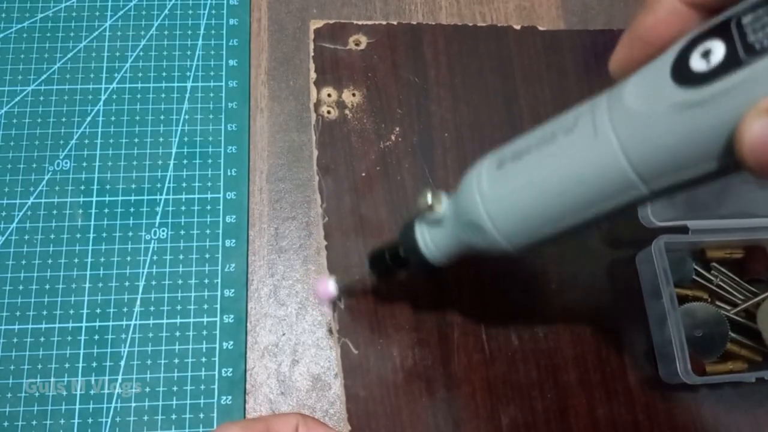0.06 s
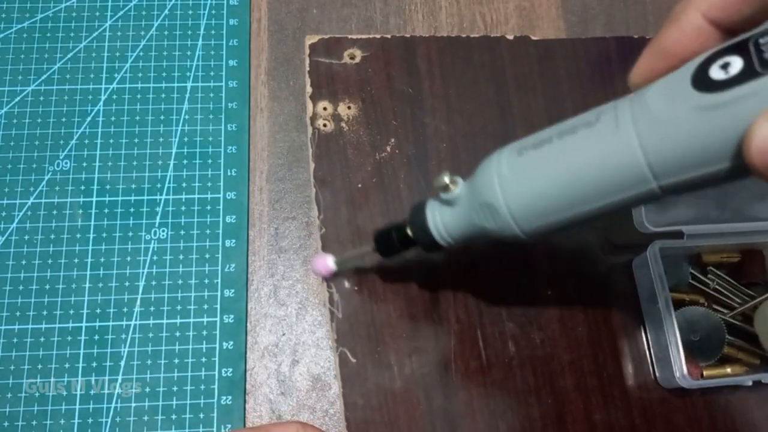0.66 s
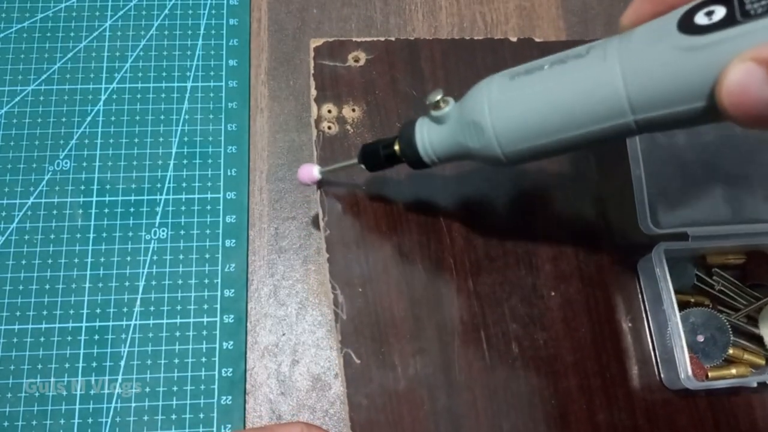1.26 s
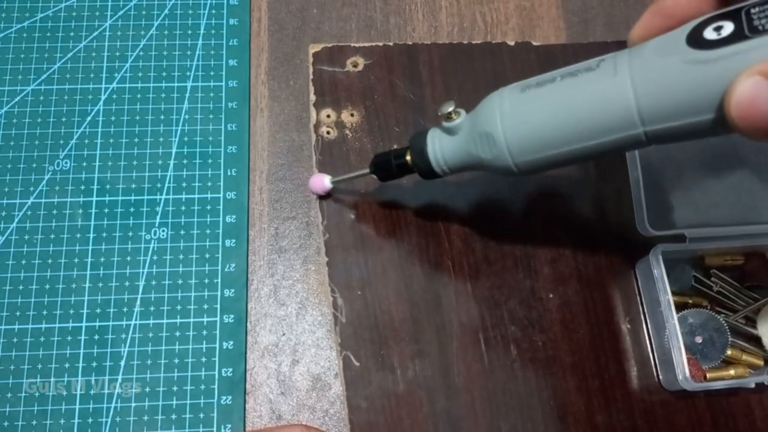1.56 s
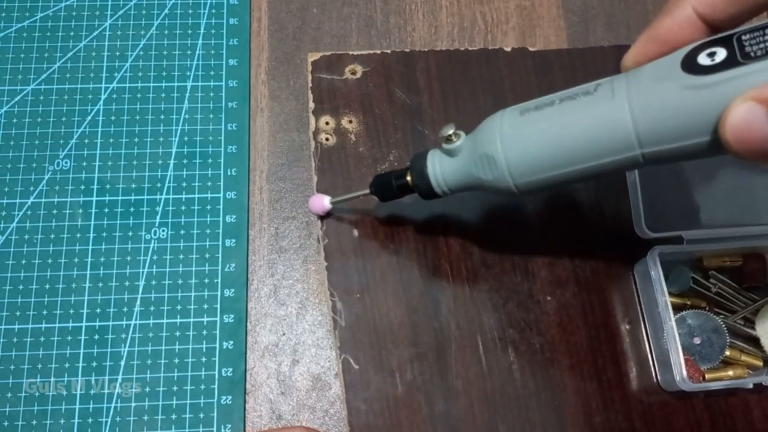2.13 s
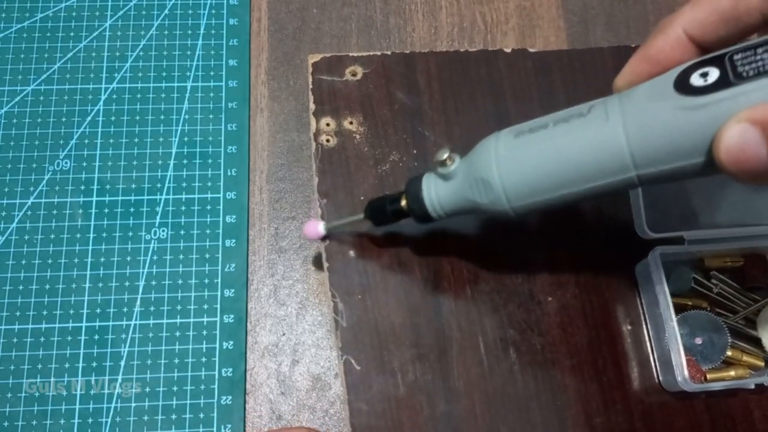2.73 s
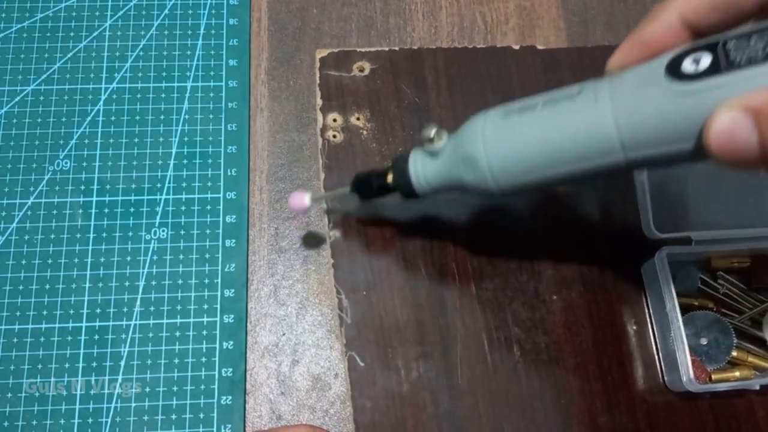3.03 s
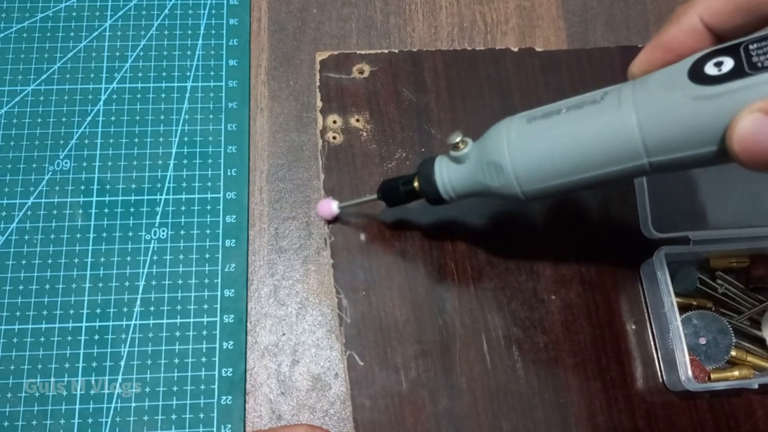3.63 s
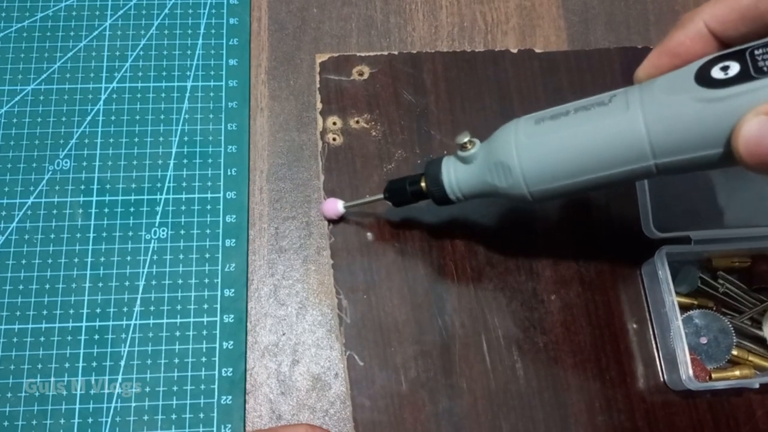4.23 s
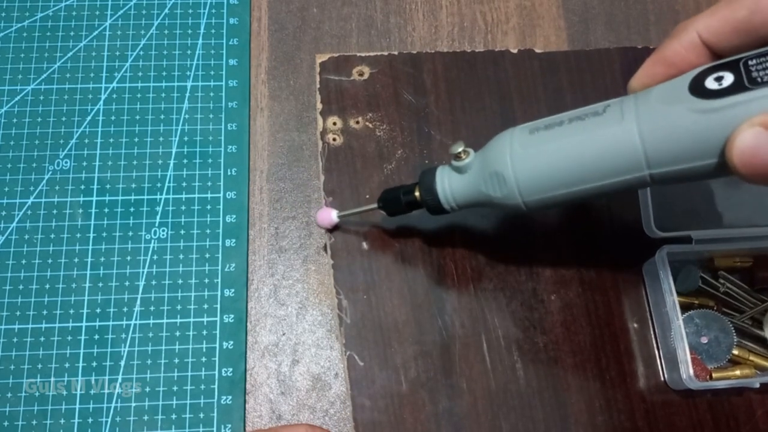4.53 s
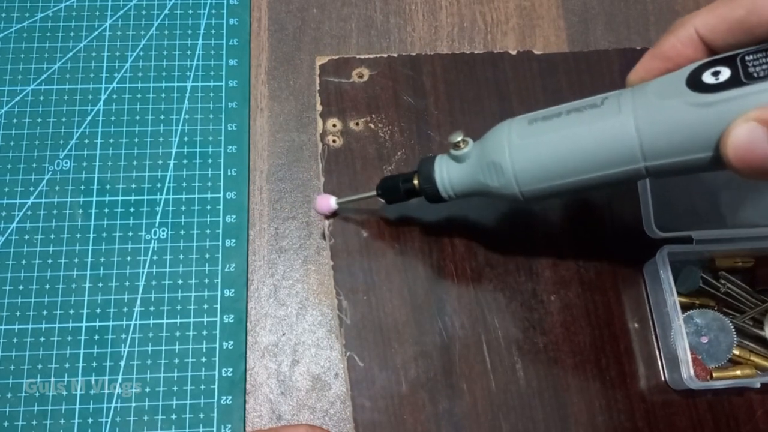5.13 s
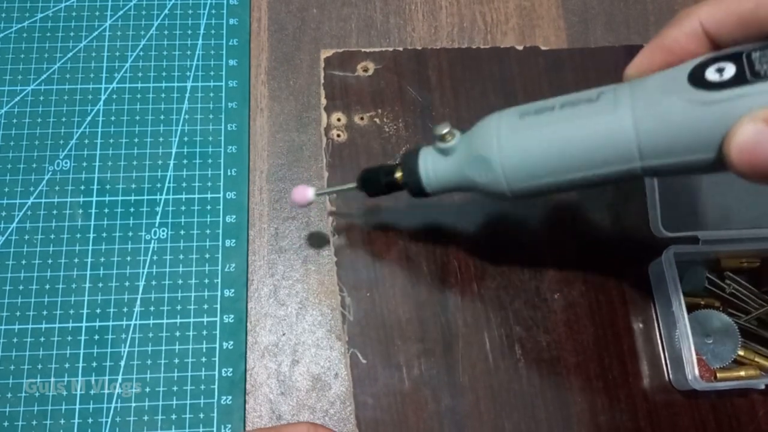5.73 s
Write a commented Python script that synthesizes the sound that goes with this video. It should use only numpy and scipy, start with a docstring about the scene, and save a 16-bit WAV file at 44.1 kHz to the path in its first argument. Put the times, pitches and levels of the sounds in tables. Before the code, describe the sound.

A small electric rotary tool is already grinding a wooden board edge, close up in a quiet room. Its rough buzz carries a dusty hiss, with a hollow ring and thin squeals around 0.5 seconds, then turns to a skipping chatter before lifting at 1.2. The motor whirs quietly with a thin whine. A second pass runs from 1.4 to 2.9 seconds, sinking in pitch, growing loudest near 2.1 and ending with a few ticks. After another short whir comes a lighter, ticking touch from 3.2 to 3.4. The longest pass runs from 3.6 to 5.6 seconds: the buzz slows and deepens, rings strongly with a faint squeal near 3.9, and turns more ragged and nasal around 4.3 and 5. The stone bounces and ticks near 5.5, then lifts, and the motor rises to a soft free whir.

```python
"""A small electric rotary tool grinds the edge of a wooden board with a stone, in four close-up passes.
The stone's high side rubs once a turn and makes the board ring. Pressed hard, it slows and buzzes;
held lightly, it skips and bounces. Dust hisses, the stone ticks and thin squeals come and go.
Lifted off, the motor speeds up and whirs, with brush hiss and the thin whine of its speed controller.
Behind it all is the faint air of a quiet room."""
import sys
import numpy as np
from scipy import signal
from scipy.fft import rfft, irfft
from scipy.io import wavfile
from scipy.ndimage import uniform_filter1d, map_coordinates

SR = 44100
rng = np.random.default_rng(int(sys.argv[2]) if len(sys.argv) > 2 else 0)


def to_wav(sig):
    """Store sig (one row per channel, or 1-D mono) as 16-bit WAV at the path in sys.argv[1].

    Samples outside -1..1 are clipped; the rate is SR.
    """
    pcm = np.clip(np.atleast_2d(sig), -1, 1) * 32767
    pcm = np.round(pcm).astype(np.int16)
    wavfile.write(sys.argv[1], SR, pcm.T)  # frames by channels


N = 254898
T = np.arange(N) / SR
FFT_SIZE = 9 * 2 ** 15
FREQ = np.maximum(np.arange(FFT_SIZE // 2 + 1) * SR / FFT_SIZE, 1)

# tone colour of the still room: pitch_hz, gain_db
AIR_COLOUR = [(20, -8), (60, 1), (130, 4), (250, -22), (1000, -39), (16000, -21)]
# right microphone compared with the left: pitch_hz, gain_db
STEREO_TILT = [(130, -0.2), (260, -5), (500, 1.5), (1000, -0.6), (2000, -1.5), (4000, -1.5), (8000, 3.5),
               (13000, 2)]
# left-right difference compared with what both sides share: pitch_hz, gain_db
STEREO_SPREAD = [(130, -20.5), (260, -14.5), (500, -11), (1000, -12.5), (2000, 0.5), (4000, 0.5),
                 (8000, -0.5), (13000, -1.5)]
# how much of that difference is scattered sound: pitch_hz, share_db
STEREO_SCATTER = [(130, -2), (500, -4), (1000, -13), (2000, -33), (4000, -10), (16000, -15)]
# tones of the motor: multiple_of_shaft_speed, relative_db
MOTOR_TONES = [(5, -8), (6, 6.5), (7, -29), (8, 9.5), (9, 12.5), (10, -8), (11, 5.5), (12, -41), (13, -18),
               (14, -3), (15, 7), (16, -14), (20, -6), (21, 4.5), (36, -3), (42, -22)]
# tone colour of the brushes sliding on the motor's contacts: pitch_hz, gain_db
BRUSH_COLOUR = [(100, -14), (600, -12), (1100, 6.5), (2300, 3), (3600, 1.5), (4700, 3), (6700, 2.5),
                (7300, -6), (10200, -5), (11500, 5), (13500, 2), (14400, 9), (16000, -4)]
# modes (pitches at which a thing likes to ring) of the motor's case: pitch_hz, width_hz, lift_db
HOUSING_MODES = [(5230, 250, 3), (11400, 460, 4), (12600, 540, 7)]
# the speed controller's whine: pitch_hz, free_running_db, rise_db_per_hz_of_slowing
WHINE_TONES = [(3903, -62.5, .17), (7806, -68, 0), (11709, -72, 0), (15612, -69, 0)]
# shaft speed on the wood, one list for each pass: time_s, speed_hz
SHAFT_SPEED = [
    [(0.0, 146.7), (0.164, 151.6), (0.184, 150.9), (0.252, 146.8), (0.4, 144.4), (0.558, 135),
     (0.616, 139.9), (0.682, 140.8), (0.738, 138.8), (0.782, 140.6), (0.824, 139.1), (0.916, 138.2),
     (1.114, 138.8), (1.142, 141.1), (1.205, 141)],
    [(1.4, 150.1), (1.436, 151.4), (1.49, 148.8), (1.558, 149), (1.762, 133.1), (1.83, 131), (1.976, 137.1),
     (2.064, 127.9), (2.352, 119.2), (2.624, 116.1), (2.67, 121), (2.756, 118.2), (2.82, 122.2),
     (2.866, 137.2), (2.9, 139.3)],
    [(3.2, 156.8), (3.218, 155.5), (3.288, 152.1), (3.322, 154.3), (3.39, 149.6), (3.42, 147.4)],
    [(3.57, 153.4), (3.69, 139.9), (3.862, 128.4), (4.134, 124.4), (4.218, 121.2), (4.378, 124.6),
     (4.45, 119.3), (4.634, 115.7), (4.76, 114.9), (5.066, 120.5), (5.182, 119.7), (5.282, 110.8),
     (5.31, 110.6), (5.492, 129.2), (5.56, 142.4)],
]
# each pass and the base level of each part of the board's sound:
# touch_s, lift_s, body_db, rasp_db, nasal_db, low_nasal_db, drone_db, thrum_db
PASSES = [(-.1, 1.204, -35.5, -34.5, -35, -74, -50, -40.5),
          (1.405, 2.945, -33, -34.5, -40.5, -50, -42, -32), (3.2, 3.439, -37, -37, -44, -47, -52.5, -32.5),
          (3.57, 5.586, -32.5, -34, -35.5, -48.5, -41, -34.5)]
# how hard the stone rubs and cuts, one list for each pass: time_s, rub_db, dust_db
RUB_STRENGTH = [
    [(0.0, -33.5, -37), (0.068, -35, -42.5), (0.098, -62, -49), (0.106, -34.5, -38), (0.138, -38.5, -40),
     (0.218, -32.5, -31), (0.322, -31.5, -34), (0.474, -31.5, -31.5), (0.494, -29.5, -28),
     (0.658, -30.5, -33.5), (0.714, -34.5, -37), (0.804, -29, -33.5), (0.848, -35, -38.5),
     (1.156, -34, -38), (1.195, -32.5, -38)],
    [(1.41, -35.5, -38), (1.494, -32.5, -35.5), (1.524, -35.5, -40), (1.698, -29.5, -33.5),
     (1.732, -29.5, -27), (1.886, -30, -30), (1.942, -32, -32), (2.082, -23, -30.5), (2.16, -25, -33.5),
     (2.286, -37, -43.5), (2.338, -32, -36), (2.572, -33, -38), (2.666, -31.5, -28), (2.714, -34.5, -33.5),
     (2.824, -32, -36), (2.846, -32.5, -45), (2.9, -33.5, -44), (2.94, -33, -58)],
    [(3.21, -67, -51), (3.216, -43.5, -48), (3.29, -42, -47), (3.315, -34, -44), (3.41, -35, -49),
     (3.44, -37.5, -49)],
    [(3.57, -32.5, -34.5), (3.65, -34.5, -34.5), (3.68, -30, -27.5), (3.69, -34.5, -31.5),
     (3.92, -25.5, -29), (4.12, -30, -33), (4.29, -29.5, -26), (4.31, -30, -28), (4.35, -26, -28.5),
     (4.52, -37, -36.5), (4.57, -39, -40.5), (4.78, -37.5, -40), (4.81, -31.5, -31.5), (5.0, -31.5, -28.5),
     (5.28, -36.5, -38.5), (5.36, -33, -34), (5.44, -33.5, -36), (5.49, -33.5, -39), (5.55, -31.5, -47),
     (5.58, -40.5, -56)],
]
# the stone moves to the next of three spots: time_s
MOVE_TIMES = [1.3, 3.1]
# the stone rides loosely: start_s, end_s, bounce_0_to_1
BOUNCES = [(-.1, .28, 0.49), (.66, 1.25, 0.51), (1.3, 1.48, 0.4), (2.71, 3.0, 0.53), (3.1, 3.65, 0.5),
           (5.24, 5.4, 0.22), (5.4, 5.8, 0.79)]
# the stone hops, so every second turn lands more weakly: start_s, end_s, skip_0_to_1
SKIPS = [(.085, .2, 0.1), (.92, 1.21, 0.85)]
# the stone bites in and the nasal modes take over:
# start_s, end_s, nasal_lift_db, body_change_db, rasp_change_db, thrum_change_db
BITES = [(.29, .48, 6, 4.5, 4.5, 6.5), (1.99, 2.23, 3.5, -2.5, 1, -10.5), (2.32, 2.67, 8, -1.5, 2, -6.5),
         (2.64, 2.668, 7.5, 3, -5, -8), (4.14, 4.41, 4.5, 1.5, -3, -4.5), (4.8, 5.15, 9.5, 1, -2.5, -3)]
# the board bobs most when the shaft turns near its lowest mode: speed_hz, gain_db
THRUM_BY_SPEED = [(114, -15), (120, -7), (129, -4), (140, -0.5), (152, -5)]
# the stone ticks as it lands, hops or catches: time_s, strength_db, treble_db
STONE_TICKS = [(0.1037, -31, 1.5), (0.8079, -25.5, -2), (1.064, -23, -5.5), (1.194, -26.5, -2),
               (1.403, -31, 1), (2.66, -24, -6), (2.771, -21, -7), (2.792, -23, -3), (2.8317, -23, -13),
               (3.2036, -30.5, -8), (3.2109, -33.5, -2), (3.239, -35, 1.5), (3.2505, -30, -5),
               (3.269, -31.5, -4), (3.309, -36, 1), (3.353, -40, -1), (3.366, -32, -2), (3.382, -35, -4),
               (3.394, -33, -3), (3.4194, -30.5, -3), (3.44, -34, -3), (3.562, -24, -1.5),
               (3.574, -23.5, -7), (3.6642, -27, 0), (5.471, -20, -10), (5.51, -28, -10)]
# the finest sizzle of the dust: time_s, strength_db
SIZZLE = [(0.0, -35), (0.07, -39.5), (0.12, -37), (0.15, -38), (0.24, -30.5), (0.31, -34), (0.82, -33.5),
          (0.85, -39.5), (1.11, -36), (1.19, -37), (1.42, -36), (1.48, -34.5), (1.52, -40.5), (1.73, -31.5),
          (1.87, -28.5), (1.94, -38), (2.09, -29.5), (2.29, -35.5), (2.41, -31), (2.68, -29.5),
          (2.81, -37.5), (2.86, -57), (2.94, -56), (3.21, -51), (3.24, -53), (3.44, -57), (3.58, -36),
          (3.79, -31), (4.13, -33), (4.27, -28), (4.33, -34), (4.48, -32.5), (4.55, -36.5), (4.66, -36.5),
          (4.96, -27), (5.11, -32.5), (5.15, -29.5), (5.45, -35.5), (5.5, -54), (5.58, -55)]
# the stone squeals: start_s, end_s, multiple_of_shaft_speed, strength_db
SQUEALS = [(.39, .62, 25, -48), (.33, .65, 33, -49.5), (1.588, 1.74, 32, -44), (1.66, 1.811, 25, -43),
           (2.325, 2.62, 27, -53), (3.78, 4.052, 27, -50), (4.841, 4.989, 34, -44)]
# broad tone colour of the rubbing: pitch_hz, gain_db
RUB_COLOUR = [(60, -67.5), (200, -10), (340, 12), (500, 5.5), (900, 2), (1400, 7.5), (2500, -0.5),
              (4000, 1), (6000, 1.5), (8000, -2), (11000, -2.5), (16000, -3)]
# modes of board and tool at the first spot, mid-edge: pitch_hz, width_hz, lift_db
EDGE_MODES = [(812, 56, 9.5), (1475, 63, 9), (1738, 65, 11.5), (2284, 64, 12.5), (2496, 27, 11),
              (3450, 550, 16.5), (4520, 1660, 22), (7200, 1100, 11)]
# at the second spot, near the corner: pitch_hz, width_hz, lift_db
CORNER_MODES = [(720, 110, 6), (1440, 100, -3.5), (1530, 130, 8.5), (2020, 84, 7), (2440, 280, 18),
                (3190, 900, 11.5), (4850, 230, 7.5), (6900, 760, 6.5), (11840, 6400, 13)]
# at the third spot, a little further down: pitch_hz, width_hz, lift_db
GROOVE_MODES = [(479, 31, -30), (839, 14.94, 7), (1440, 72.2, 0), (1531.3, 100, 4), (2010, 470, 3),
                (2450, 500, 8), (3415, 780, 13), (3957, 440, 2.5), (4850, 453, 10), (7140, 1790, 7),
                (8678, 494, 8.5), (10470, 930, 10), (11700, 690, 8.5), (13600, 1200, 7.5)]
# the board's nasal-sounding mode, one row for each spot: pitch_hz, half_width_hz
NASAL_MODES = [(1114, 160), (1084, 97), (1073, 118)]
# the stone wakes one sharp mode: start_s, end_s, pitch_hz, half_width_hz, level_db
RINGS = [(0.417, 0.653, 2550, 110, -39.5), (0.487, 0.581, 3450, 90, -38), (0.647, 0.858, 2960, 110, -43),
         (0.725, 0.829, 660, 89, -38), (0.836, 0.974, 580, 39.98, -47.5), (0.97, 1.136, 2400, 130, -43),
         (1.426, 1.562, 2570, 110, -54), (1.67, 2.127, 1560, 70, -43), (2.381, 2.645, 2530, 121, -40),
         (2.634, 2.67, 3484, 300, -40), (3.646, 4.144, 1548, 50, -33.5), (3.8, 4.087, 1164, 59.7, -33.5),
         (4.786, 4.856, 2482, 199.6, -34), (4.799, 5.102, 848, 49, -37.5), (4.87, 4.997, 4065, 300, -36.5),
         (5.099, 5.4, 2422, 170.1, -44.5)]
# the groove frays and the rasp loses its pitch: start_s, end_s, extra_tearing_share
FRAYS = [(4.14, 4.45, 0.42), (4.8, 5.42, 0.42)]

FIRM_BOUNCE = .055  # even a firmly held stone bounces this much


def undb(db):
    """Turn decibels into a gain."""
    return 10 ** (np.asarray(db) / 20)


def curve(table):
    """Join a table's timed points with straight lines, one curve for each column."""
    times, *columns = np.transpose(table)
    return [np.interp(T, times, column) for column in columns]


def spells(table, edge_s):
    """Hold each row's strengths from start to end, with a ramp at both edges."""
    return sum(np.outer(strengths, np.clip(np.minimum(T - start, end - T) / edge_s + .5, 0, 1))
               for start, end, *strengths in table)


def unit(x):
    """Scale to an average (rms) level of 1."""
    return x / np.sqrt(np.mean(x ** 2))


def running_level(x):
    """The average (rms) level around each moment."""
    return np.sqrt(np.maximum(uniform_filter1d(x ** 2, 3000), 0) + 1e-12)


def even(x):
    """Hold the level near 1, keeping the fast detail."""
    return x / running_level(x)


def smooth_random(grid_size, places):
    """Glide smoothly through a grid of random numbers."""
    return map_coordinates(rng.standard_normal(grid_size), places, order=3, mode="grid-wrap")


def waver(depth=1.5, per_s=11):
    """A slow random drift, used for level (dB) or phase (radians)."""
    return depth * smooth_random(256, [T * per_s])


def colour(points, modes=()):
    """Gain in dB at every frequency: a broad curve with modes on top."""
    hz, db = np.transpose(points)
    peaks = sum(lift / (1 + (2 * (FREQ - pitch) / width) ** 2) for pitch, width, lift in modes)
    return np.interp(np.log(FREQ), np.log(hz), db) + peaks


def ring(x, gain_db):
    """Filter so that modes ring after each push, never before it (minimum phase)."""
    cepstrum = irfft(np.log(undb(gain_db)))
    cepstrum[1:FFT_SIZE // 2] *= 2
    cepstrum[FFT_SIZE // 2 + 1:] = 0
    return irfft(rfft(x, FFT_SIZE) * np.exp(rfft(cepstrum)))[..., :N]


def band(x, low_hz, high_hz):
    """Keep only what lies between two frequencies, without delay."""
    sos = signal.butter(4, [low_hz, min(high_hz, SR / 2 - 100)], "band", fs=SR, output="sos")
    return signal.sosfiltfilt(sos, x)


def shifting(x, per_s=17, width_hz=210, depth_db=3.2):
    """Narrow peaks in the tone come and go as the point of contact creeps along."""
    hz, times, spectra = signal.stft(x, SR, nperseg=512)
    places = np.meshgrid(hz / width_hz, times * per_s, indexing="ij")
    return signal.istft(spectra * undb(depth_db * smooth_random((256, 256), places)), SR)[1][:N]


def room_air(level_db=-63.5):
    """The still room: faint, low noise, different in each ear."""
    return undb(level_db) * unit(ring(rng.standard_normal((2, N)), colour(AIR_COLOUR)))


def room_stereo(x, echo_s=0.44, echo_db=-18, lag_s=0.000078):
    """Two close microphones hear the tool slightly apart in time; table and walls add a short echo."""
    age = np.arange(SR // 3) / SR
    tails = rng.standard_normal((2, len(age))) * undb(-60 * age / echo_s)
    tails = rfft(tails / np.sqrt(np.sum(tails ** 2, axis=1, keepdims=True)), FFT_SIZE)
    scattered = np.minimum(undb(colour(STEREO_SCATTER)), 1)
    # a small lag puts the difference a quarter cycle ahead of the shared sound
    lead = 1j * np.tanh(20 * np.sin(2 * np.pi * FREQ * lag_s))
    shared = rfft(x, FFT_SIZE) * (1 + undb(echo_db) * tails[0])
    side = rfft(shifting(x), FFT_SIZE) * undb(colour(STEREO_SPREAD))
    side *= np.sqrt(1 - scattered ** 2) * lead + scattered * tails[1]
    tilt = undb(colour(STEREO_TILT) / 2)
    return irfft(np.array([(shared + side) / tilt, (shared - side) * tilt]))[:, :N]


def shaft_speed(free_hz, run_up_s=.125):
    """The wood drags the shaft down; after each pass it runs up towards its free speed."""
    hz = curve(np.vstack(SHAFT_SPEED))[0]
    next_starts = [rows[0][0] for rows in SHAFT_SPEED[1:]] + [np.inf]
    for rows, next_s in zip(SHAFT_SPEED, next_starts):
        end_s, end_hz = rows[-1]
        free = (T > end_s) & (T < next_s)
        hz[free] = free_hz + (end_hz - free_hz) * np.exp(-(T[free] - end_s) / run_up_s)
    return hz


def rough_ring(cycles, wear_per_s):
    """A rough pattern that repeats every cycle and slowly wears into a new one."""
    return even(smooth_random((256, 300), [T * wear_per_s, cycles % 1 * 300]))


def motor(turns, slowing_hz, tone_db=-50, brush_db=-46, spark=0.55, flutter=0.29, ripple=0.095):
    """The case hums, the brushes tick and spark, and the controller's whine ripples with each turn."""
    angle = 2 * np.pi * turns
    tones = sum(undb(db) * np.sin(multiple * angle + 2 * np.pi * rng.random())
                for multiple, db in MOTOR_TONES)
    brushes = rough_ring(turns, wear_per_s=2.77) + spark * rng.standard_normal(N)
    brushes *= 1 + flutter * np.cos(2 * angle)
    brushes = ring(brushes, colour(BRUSH_COLOUR, HOUSING_MODES))
    whine = sum(undb(db + rise * slowing_hz + waver()) * np.sin(2 * np.pi * hz * T + waver())
                for hz, db, rise in WHINE_TONES)
    current = 1 + ripple * (np.cos(angle) + np.cos(2 * angle))
    return undb(tone_db) * unit(tones) + undb(brush_db) * unit(brushes) + np.sqrt(2) * whine * current


def hand(attack_s=0.0026, release_s=0.0024):
    """How the stone is held: how much it touches, bounces and skips, each from 0 to 1."""
    touch = sum(np.clip((T - on) / attack_s, 0, 1) * np.clip((off - T) / release_s + 1, 0, 1)
                for on, off, *_ in PASSES)
    bounce = np.clip(spells(BOUNCES, edge_s=.13)[0], FIRM_BOUNCE, 1)
    skip = np.clip(spells(SKIPS, edge_s=0.2)[0], 0, 1)
    return touch, bounce, skip


def part_levels(shaft_hz, bounce, skip, usual_rub_db=-30, usual_dust_db=-34):
    """Each part's strength in dB: harder rubbing is louder; bites, bounce and skip tip the balance."""
    passes = np.array(PASSES)
    body, rasp, nasal, low_nasal, hum, bob = passes[np.searchsorted(passes[1:, 0], T), 2:].T
    bite_nasal, bite_body, bite_rasp, bite_thrum = spells(BITES, edge_s=0.012)
    rub_db, dust_db = curve(np.vstack(RUB_STRENGTH))
    press = rub_db - usual_rub_db
    cutting = dust_db - usual_dust_db
    singing = 1.58 * press + bite_nasal - 12 * skip
    # a hollow mode howls up and dies away as the stone crosses one place in the first pass
    past_peak_s = T - 0.61
    howl = -33.5 - np.maximum(-12 * past_peak_s, 28 * past_peak_s)
    tuning = np.interp(shaft_hz, *np.transpose(THRUM_BY_SPEED))
    # a bouncing stone knocks more than it cuts; low modes waver as the contact creeps
    return {"body": body + press + bite_body,
            "rasp": rasp + 0.35 * press + 0.85 * cutting + bite_rasp - 7.5 * bounce + 5 * skip,
            "dust": dust_db,
            "sizzle": curve(SIZZLE)[0],
            "nasal": nasal + singing,
            "low nasal": low_nasal + singing + waver(),
            "howl": howl + press,
            "drone": hum + 0.83 * press + 4.5 * bounce + 7 * skip + waver(),
            "thrum": bob + tuning + 1.95 * press + bite_thrum + 4.5 * bounce - 0.5 * skip + waver()}


def stone_ticks(gain_db=-9, decay_s=.003, treble_hz=3500):
    """Short clicks and ticks, sharp or dull, as the stone lands, hops or catches."""
    force = np.zeros(N)
    age = np.arange(1024) / SR
    for time_s, strength_db, treble_db in STONE_TICKS:
        noise = rng.standard_normal(len(age))
        tick = noise + (undb(treble_db) - 1) * band(noise, treble_hz, SR / 2)
        start = int(time_s * SR)
        force[start:start + len(age)] += undb(strength_db + gain_db) * tick * np.exp(-age / decay_s)
    return ring(force, colour([(100, -65), (600, 17.5), (1500, 17), (4500, 15), (8000, 11.5),
                               (15000, 15.5)], modes=[(2430, 100, 3.6)]))


def wood(forces, spot):
    """The board colours each force with the modes of the spot that the stone is on."""
    return sum(ring(np.array(forces) * (spot == k), colour(RUB_COLOUR, modes))
               for k, modes in enumerate([EDGE_MODES, CORNER_MODES, GROOVE_MODES]))


def dust(bump, grit, fibres, pressure, bounce, spot, db, reflection_s=.0016, spray_db=-9):
    """Grit and torn fibre scrape, hiss and sizzle: a direct sound and a wide stereo spray."""
    chips = even(pressure * rng.standard_normal(N))
    repeating = .5 * bump + grit
    reflected = np.roll(repeating, int(reflection_s * SR))  # off the table
    # each pair holds the direct sound, then the spray
    scraping = wood([shifting(repeating + (bounce + .5) * fibres), shifting(reflected + chips)], spot)
    tearing = wood([shifting(.9 * grit + fibres), shifting(chips)], spot)
    scrape = even(band(scraping, 2800, 5700)) * undb((db["rasp"] + db["dust"]) / 2 - 3)
    hiss = even(band(tearing, 5500, 10000)) * undb(db["dust"] - 6.5)
    sizzle = even(band(tearing, 9700, 18000)) * undb(db["sizzle"] - 2)
    direct, spray = scrape + hiss + sizzle
    return direct, undb(spray_db) * np.array([spray, -spray])


def squeals(turns, throb=.7, jitter_rad=.55, jitter_per_s=170):
    """Thin, rough whines that glide with the shaft and swell as the high side comes round."""
    jitter = jitter_rad * smooth_random(1024, [T * jitter_per_s])
    tones = np.zeros(N)
    for start, end, multiple, db in SQUEALS:
        gain = spells([(start, end, undb(db))], edge_s=0.017)[0]
        tones += gain * np.sin(2 * np.pi * (multiple * turns + rng.random()) + jitter)
    return np.sqrt(2) * tones * (1 - throb * np.cos(2 * np.pi * turns)) * undb(waver())


def thrum(pressure, touch, driven_db, fade_db_per_s=210):
    """The whole board bobs on the table in its lowest mode, and rings on briefly when the stone lifts."""
    response = colour([(25, -30), (70, -15), (100, 14.5), (125, 2), (170, 21.5), (240, -1), (600, -63)],
                      modes=[(135, 42, 9)])
    # the level may jump up, but can only fall as fast as the fade
    fade = fade_db_per_s * T
    db = np.maximum.accumulate(np.where(touch > 0, driven_db, -np.inf) + fade) - fade
    return even(ring(pressure.mean() - pressure, response)) * uniform_filter1d(undb(db), size=900)


def drone(force):
    """The board's low bending modes hum under the buzz."""
    return even(ring(force, colour([(100, -56.5), (170, 4.5), (210, 9), (260, -1.5), (310, 4),
                                    (380, 0.5), (450, -1), (700, -32.5)])))


def sing(force, hz, half_width_hz):
    """One strong board mode fed by the stone: the same peak filter, run twice."""
    b, a = signal.iirpeak(hz, hz / (2 * half_width_hz), fs=SR)
    return even(signal.lfilter(b, a, signal.lfilter(b, a, force)))


def knocks(samples_from_hit, strength, bass_lag_s=.0007, knee_hz=1300):
    """A click at each hit, smeared into a chirp because low bending waves travel more slowly."""
    clicks = np.sinc(samples_from_hit) * np.exp(-(samples_from_hit / 6) ** 2) * strength
    lag_cycles = bass_lag_s * knee_hz * np.arctan(FREQ / knee_hz)
    return irfft(rfft(clicks, FFT_SIZE) * np.exp(-2j * np.pi * lag_cycles))[:N]


def rubbing(turns, bounce, skip, arc_turns=0.29, stray=0.184, scrape_s=.009):
    """The stone's high side bumps and its grit scrapes once a turn, while fibres tear at random."""
    turn = turns.astype(int)
    turns_per_sample = np.gradient(turns)
    position = turns % 1 - .5
    # a loose stone lands early or late, hard or soft
    timing, hardness = np.clip(rng.standard_normal((1024, 2)), -2, 2)[turn].T
    from_hit = position - np.clip(stray * (bounce - FIRM_BOUNCE / 2) * timing, -.4, .4)
    weight = undb(2.5 * bounce * hardness)
    landed = 1 - skip * (turn % 2)
    # a hopping stone digs in for longer and drags less between landings
    dig = np.exp(-(from_hit / (arc_turns * (1 + skip / 2))) ** 2 / 2)
    drag = 1 - skip
    pressure = weight * (landed * dig + drag)
    bump = -even(knocks(from_hit / turns_per_sample, weight * landed))
    # each turn sets off nearly the same scrape, whatever the speed
    since_s = position / (turns_per_sample * SR)
    grit = even(pressure * rough_ring(since_s / scrape_s, wear_per_s=7))
    fibres = even(pressure * rng.standard_normal(N))
    # the looser the stone, the weaker the parts that repeat
    return (1 - bounce) * bump, (1 - bounce) * grit, fibres, pressure


def grinding(bump, grit, fibres, bounce, spot, db):
    """The main buzz: knocks and scrapes ring the board, with more tearing when the stone is loose."""
    frayed = spells(FRAYS, edge_s=0.025)[0] * band(fibres, 1300, 18000)
    body_force = 1.15 * bump + grit + (bounce + .24) * fibres + frayed
    rasp_force = bump + grit + (bounce + .17) * fibres + frayed
    low, middle = wood([body_force, shifting(rasp_force)], spot)
    body = band(low, 420, 2050) / running_level(band(low, 1250, 2050)) * undb(db["body"])
    rasp = even(band(middle, 1950, 2900)) * undb(db["rasp"])
    # the strong modes follow the steady bump more than the grit
    steady = bump + 0.64 * grit + 0.19 * bounce * fibres
    howl = sing(steady, hz=563, half_width_hz=35) * undb(db["howl"]) * (spot == 0)
    nasal = sum(sing(steady, *mode) * (spot == k) for k, mode in enumerate(NASAL_MODES))
    nasal *= undb(db["nasal"])
    low_nasal = sing(steady, hz=785, half_width_hz=54) * undb(db["low nasal"])
    ring_force = steady + .15 * fibres + frayed
    rings = sum(sing(ring_force, *mode) * spells([(start, end, undb(level_db))], edge_s=0.017)[0]
                for start, end, *mode, level_db in RINGS)
    hum = drone(bump + grit + bounce * fibres) * undb(db["drone"])
    return body + rasp + howl + nasal + low_nasal + rings + hum


def scene(free_hz=156.15):
    """The tool grinds the board in a quiet room; one turning shaft sets the pace."""
    shaft_hz = shaft_speed(free_hz)
    turns = .5 + np.cumsum(shaft_hz) / SR
    spot = np.searchsorted(MOVE_TIMES, T)
    touch, bounce, skip = hand()
    db = part_levels(shaft_hz, bounce, skip)
    bump, grit, fibres, pressure = rubbing(turns, bounce, skip)
    hiss, spray = dust(bump, grit, fibres, pressure, bounce, spot, db)
    buzz = grinding(bump, grit, fibres, bounce, spot, db)
    board = touch * (buzz + squeals(turns) + hiss) + thrum(pressure, touch, db["thrum"])
    air = room_air()
    tool_and_board = board + stone_ticks() + motor(turns, slowing_hz=free_hz - shaft_hz)
    return room_stereo(tool_and_board) + touch * spray + air


def record(dry, top_hz=16000):
    """Cut away the very highest treble."""
    return signal.sosfilt(signal.ellip(10, .2, 80, top_hz, fs=SR, output="sos"), dry)


dry = scene()
out = record(dry)
to_wav(out)
```